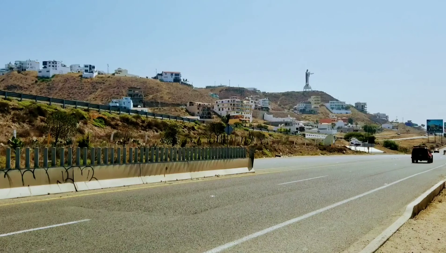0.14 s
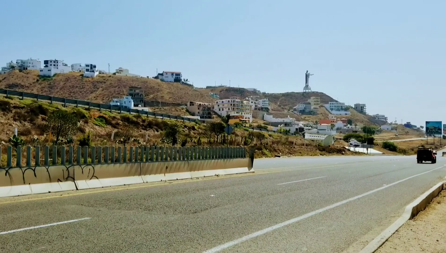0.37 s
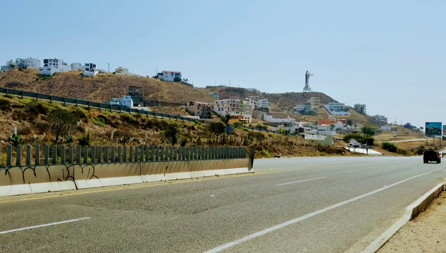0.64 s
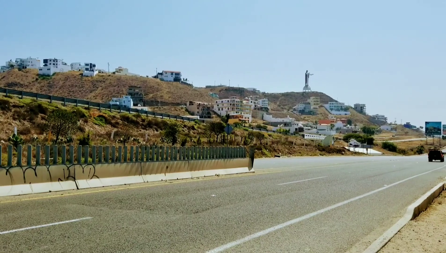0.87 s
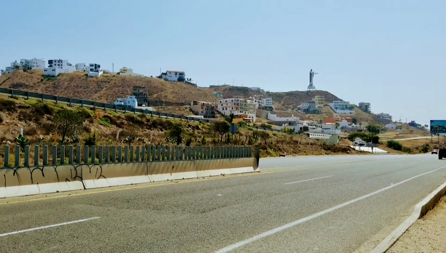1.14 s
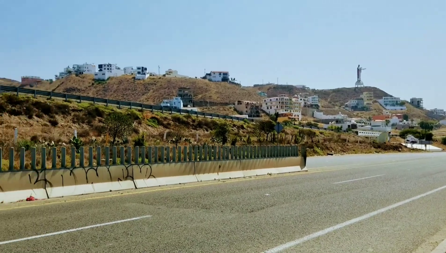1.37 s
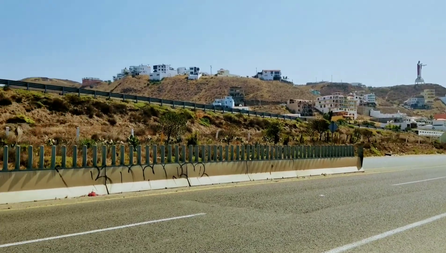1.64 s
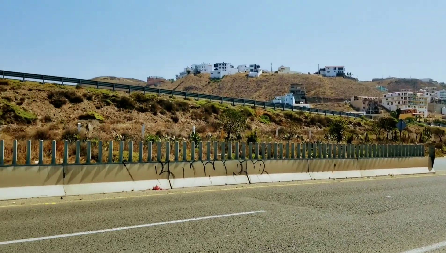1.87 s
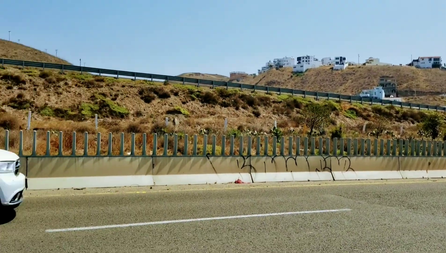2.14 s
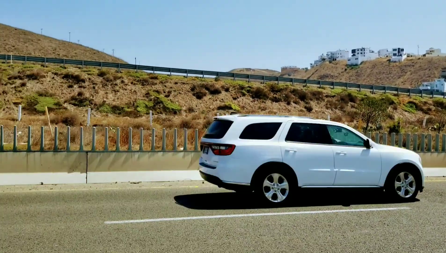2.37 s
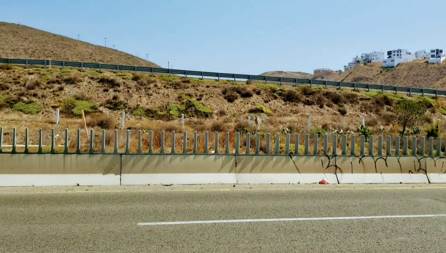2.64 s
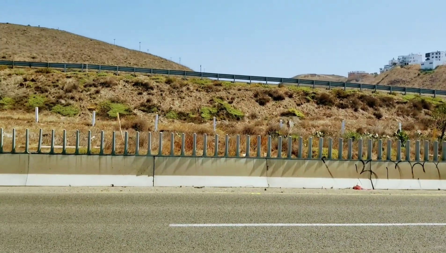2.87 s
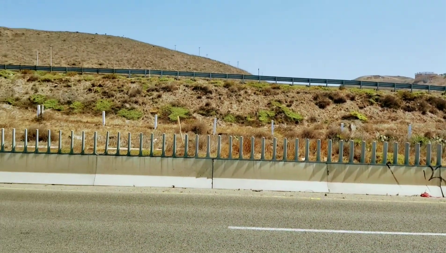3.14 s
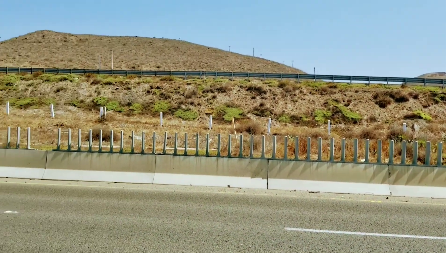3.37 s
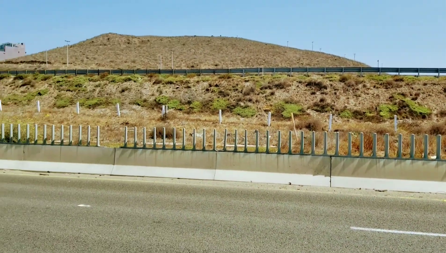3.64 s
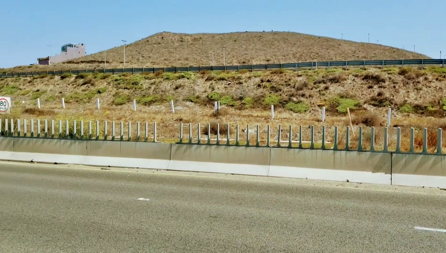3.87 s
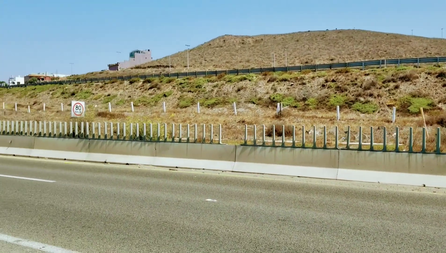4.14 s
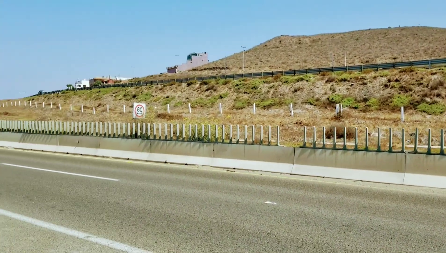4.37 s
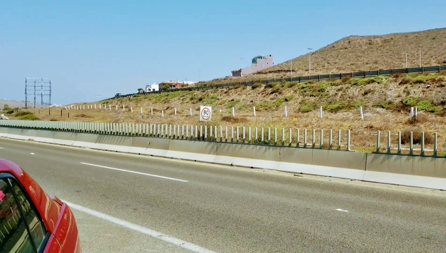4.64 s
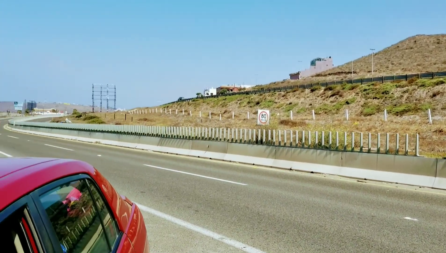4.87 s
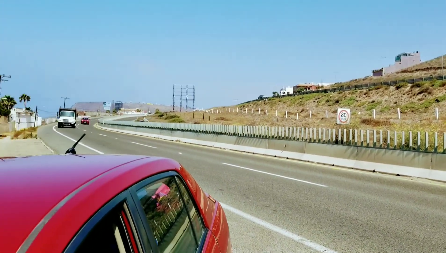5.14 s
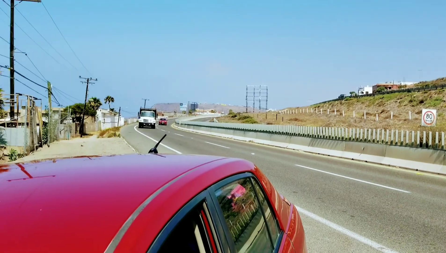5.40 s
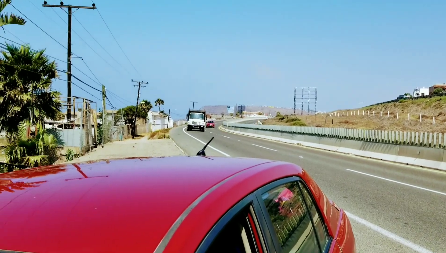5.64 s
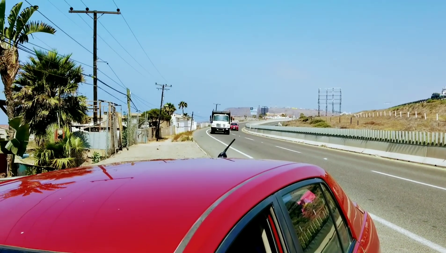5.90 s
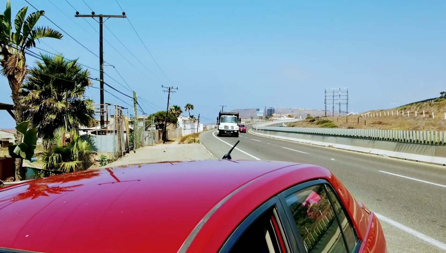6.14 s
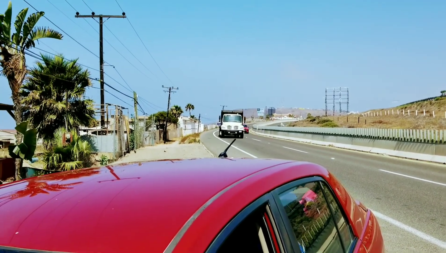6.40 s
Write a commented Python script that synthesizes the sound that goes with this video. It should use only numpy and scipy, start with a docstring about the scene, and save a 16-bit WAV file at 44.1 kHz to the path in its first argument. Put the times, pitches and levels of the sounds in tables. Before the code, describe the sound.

Outdoors beside an open highway, strong wind thumps and flutters unevenly on two microphone ports. Behind it lie a low traffic drone and bright hiss. A car's tyre roar grows from about one second, rushes past close from left to right just after two, with a throbbing boom, then fades. The wind calms, and a truck's soft wash slowly rises from up the road.

```python
"""Car passing on an open highway

A car passes close by from left to right, heard by two microphone ports that turn left in the meantime.
Tyres, body boom and air rush are shaped noise; tread and air fall in pitch, the delay between ports shifts.
From up the road come a low drone, a hiss and an approaching truck, and a bright flickering hiss, all noise.
Sharp ticks are bursts of treble noise; wind is low noise and pressure pulses, nearly separate at each port.
"""
import sys
import numpy as np
from scipy import signal
from scipy.fft import rfft, irfft, next_fast_len
from scipy.io import wavfile
from scipy.ndimage import uniform_filter1d, map_coordinates

SR = 44100
rng = np.random.default_rng(int(sys.argv[2]) if len(sys.argv) > 2 else 0)


def wav_out(sig):
    """Save sig, one row per channel (or a flat mono array), as 16-bit PCM at SR to the path in sys.argv[1]."""
    wavfile.write(sys.argv[1], SR, np.round(np.clip(np.atleast_2d(sig).T, -1, 1) * 32767).astype(np.int16))


N = 287336

STEP = 64   # samples between ticks of the slow control clock
TIMES = np.arange(0, N + STEP, STEP) / SR
FAR_BEARING_DEG = -50.5   # up the road to the left; 0 is straight across the road
CALMER_S = 4.2   # bright hiss and wind run smoother from here on


def from_db(db):
    """Turns decibels into gain."""
    return 10 ** (np.asarray(db) / 20)


def in_time(rows):
    """Reads the columns of a time table on the control clock."""
    s, *columns = np.transpose(rows)
    return [np.interp(TIMES, s, column) for column in columns]


def per_sample(control):
    """Stretches a control curve to one value per audio sample."""
    return np.interp(np.arange(N) / SR, TIMES, control)


def at_hz(points, hz, column=1):
    """Reads a spectrum table on a log-frequency axis."""
    table = np.array(points)
    return np.interp(np.log(hz), np.log(table[:, 0]), table[:, column])


def drift(rate_hz):
    """Slow random wandering with spread 1: noise smoothed twice."""
    r = np.exp(-2 * np.pi * rate_hz * STEP / SR)
    noise = rng.standard_normal(len(TIMES) + 1000)
    slow = signal.lfilter([1], [1, -2 * r, r * r], noise)[1000:]   # skip the filter's settling
    return slow / np.std(slow)


def banded(layers, patchy_db, swell_db, swell_rate, count=1, span_hz=(30, 16000), size=4):
    """Noise in bands, size to the octave, sharing the power of (shape, level, pitch factor) layers.

    All bands swell together; each also wanders alone by patchy_db.
    """
    edges = 2 ** np.arange(np.log2(span_hz[0]), np.log2(span_hz[1]), 1 / size)
    centres = np.sqrt(edges[1:] * edges[:-1])
    totals = [np.sum(from_db(2 * at_hz(shape, centres)) * np.diff(edges)) for shape, _, _ in layers]
    white = rng.standard_normal((2, count, N)) * np.sqrt(SR / 2)
    swell = swell_db * drift(swell_rate)
    out = 0
    for k, hz in enumerate(centres):
        band_filter = signal.butter(2, edges[k:k + 2], "band", fs=SR, output="sos")
        band = signal.sosfilt(band_filter, white[k % 2])   # neighbouring bands use unrelated noise
        power = sum(from_db(2 * (at_hz(shape, hz / pitch) + db)) / total
                    for (shape, db, pitch), total in zip(layers, totals))
        wander = from_db(swell + patchy_db * drift(9.2))
        out = out + band * per_sample(np.sqrt(power) * wander)
    return out


def resonance(hz, width_hz):
    """Noise ringing in one resonance, rms 1."""
    r, w = np.exp(-np.pi * width_hz / SR), 2 * np.pi * hz / SR
    tone = signal.lfilter([1, 0, -1], [1, -2 * r * np.cos(w), r * r], rng.standard_normal(N))
    return tone / np.std(tone)


# Where the ports face: start_s, facing_deg (to the right of straight across the road)
FACING = [(0, 62), (1.2, 57.5), (2.2, 52), (2.6, 28), (2.9, 17.5), (3.2, 5), (3.6, 0), (4.1, -7.5),
          (4.7, -22.5), (5.1, -27.5), (5.4, -38.5), (5.7, -50), (6.52, -54)]
PORT_GAP_MS = 0.518   # largest delay between the ports


def lag_from(bearing_deg):
    """Left port's delay in ms for a source at this bearing, as the ports turn."""
    facing_deg = in_time(FACING)[0]
    return PORT_GAP_MS * np.sin(np.radians(bearing_deg - facing_deg))


def two_ports(x, lag_ms):
    """One sound reaches the ports at two moments: left half the lag late, right half the lag early."""
    half = per_sample(lag_ms) * SR / 2000   # half the lag in samples
    return np.array([map_coordinates(x, [np.arange(N) + side * half], order=3) for side in (-1, 1)])


# Levels of the low road drone (approaching car at first, truck later) and of the far hiss:
# start_s, drone_db, hiss_db
FAR_LEVELS = [(0.0, -35, -50), (0.6, -35, -43.5), (0.9, -39, -43), (1.15, -33.5, -45), (1.35, -31.5, -46),
              (1.6, -30, -39.5), (2.0, -39, -45), (3.0, -30.5, -49), (3.4, -38.5, -47.5), (3.8, -38, -46),
              (4.15, -38, -49), (4.7, -39, -46), (5.15, -35.5, -44), (5.35, -35.5, -41), (5.6, -36, -45.5),
              (5.85, -36, -46.5), (6.52, -33.5, -51)]
# Spectrum of the drone: pitch_hz, level_db (per Hz, relative)
FAR_DRONE_SHAPE = [(50, -2), (130, -0.5), (270, 3.5), (430, -2.5), (630, -1.5), (800, -6.5), (1000, -4.5),
                   (1200, -11), (1900, -18), (3000, -30)]
# Spectrum of the far hiss: pitch_hz, level_db (per Hz, relative)
FAR_HISS_SHAPE = [(1200, -22), (2000, -4.5), (3000, -0.5), (3700, 0), (4300, 0), (5000, -10.5),
                  (6300, -10.5), (9000, -7), (11000, -11), (15500, -42)]
# Approaching truck: start_s, whine_db, tyre_wash_db, bearing_deg, wash_pitch_factor
TRUCK = [(0, -78, -75, -45, 1.05), (4.4, -76, -58, -52, 1.4), (5.0, -71, -50, -47, 1.05),
         (5.4, -48.5, -46, -39, 0.88), (5.65, -50, -43, -48, 1.07), (5.9, -49, -42.5, -56, 0.95),
         (6.15, -49.5, -40.5, -51, 1.03), (6.35, -47.5, -40.5, -48.5, 1.02), (6.52, -50, -41.5, -54, 1.05)]
# Spectrum of the truck's tyre wash: pitch_hz, level_db (per Hz, relative)
TRUCK_WASH_SHAPE = [(1000, -20), (1200, -11), (1450, 1.5), (1850, -11), (2200, -5), (2650, -8), (3300, -2),
                    (3900, -13.5), (6000, -35)]
# Resonances of the truck's engine: pitch_hz, width_hz, level_db (against the whine)
TRUCK_TONES = [(620, 47, 5.5), (1000, 130, 2), (2150, 93, -0.5)]
FAR_SPREAD_DEG = 4   # the traffic is strung out along the road


def far_traffic():
    """Hiss comes from far up the road; low drone, tyre wash and whine from the truck's bearing.

    Hiss, drone and wash spread over three bearings; all drift to the front as the ports turn.
    """
    drone_db, hiss_db = in_time(FAR_LEVELS)
    whine_db, wash_db, truck_deg, wash_pitch = in_time(TRUCK)
    road = banded([(FAR_HISS_SHAPE, hiss_db, 1)], patchy_db=.9, swell_db=.6, swell_rate=8,
                  count=3, span_hz=(1000, 16000))
    low_layers = [(FAR_DRONE_SHAPE, drone_db, 1), (TRUCK_WASH_SHAPE, wash_db, wash_pitch)]
    low = banded(low_layers, patchy_db=.9, swell_db=.6, swell_rate=8, count=3, span_hz=(45, 7000))
    whine = sum(from_db(db) * resonance(hz, width_hz) for hz, width_hz, db in TRUCK_TONES)
    # the whine sits in the middle part alone, so it makes up for the division by sqrt(3) below
    low[1] += np.sqrt(3) * whine * per_sample(from_db(whine_db))
    out = 0
    for parts, bearing in ((road, FAR_BEARING_DEG), (low, truck_deg)):
        for part, side in zip(parts, (-1, 0, 1)):
            out = out + two_ports(part, lag_from(bearing + side * FAR_SPREAD_DEG))
    return out / np.sqrt(3)


# Level of the bright hiss: start_s, level_db
BRIGHT_LEVEL = [(0, -35), (.65, -38.5), (1.2, -43), (1.4, -45), (1.65, -44.5), (2.0, -30), (2.3, -34.5),
                (2.7, -60), (3.1, -46), (3.5, -67), (4.3, -50.5), (5.1, -57), (5.5, -58), (6.52, -45.5)]
# Spectrum of the bright hiss: pitch_hz, level_db (per Hz, relative)
BRIGHT_SHAPE = [(2500, -7), (4000, 1), (4700, 5.5), (6000, 0.5), (9000, 3.5), (12000, 0), (14500, 0),
                (15800, -1)]


def bright_hiss():
    """Flickering treble noise from the bearing of the far hiss."""
    flicker_db = np.where(TIMES < CALMER_S, 2.0, 0.8)
    hiss = banded([(BRIGHT_SHAPE, in_time(BRIGHT_LEVEL)[0], 1)], patchy_db=-0.5, swell_db=flicker_db,
                  swell_rate=20, span_hz=(2000, 16000))[0]
    left, right = two_ports(hiss, lag_from(FAR_BEARING_DEG))
    # the body around the ports shades the right one's top octave
    shade = signal.butter(2, 10500, fs=SR, output="sos")
    return np.array([left, signal.sosfiltfilt(shade, right)])


# Small sharp ticks near the road: start_s, peak_db (before the band filter), left_minus_right_db
TICKS = [(0.3925, -29, 9), (0.7773, -21, 3), (0.849, -26, -6), (1.2296, -31, 1.0), (2.2994, -25, -13),
         (2.3694, -24, 1.0), (3.4005, -30, 0.5), (4.333, -35, 0.5), (5.358, -34, -2)]


def ticks():
    """Each tick is a few milliseconds of dying treble noise."""
    out, t = np.zeros((2, N)), np.arange(600) / SR
    noises = rng.standard_normal((len(TICKS), len(t))) * t * np.exp(-t / .0015)
    noises = noises / np.max(np.abs(noises), axis=1, keepdims=True)
    for (s, db, pan_db), noise in zip(TICKS, noises):
        at = round(s * SR)
        out[:, at:at + len(t)] += noise * from_db(db + pan_db * np.array([[.5], [-.5]]))
    return signal.sosfilt(signal.butter(1, [4000, 12000], "band", fs=SR, output="sos"), out)


# Steady breeze: start_s, level_db, left_minus_right_db, left_depth_db, right_depth_db
# (depth: deep thud against flutter, before the flutter's own cut)
BREEZE = [(0, -19.5, 12, 15, 19), (.3, -25, 11, 16, 7), (.65, -26.5, -4, -3, -15),
          (1.25, -36, -1, -6.5, -10), (1.9, -30, 9, -9, -11), (2.5, -25, 3, -12, -17),
          (2.8, -26.5, -3.5, -1, -1), (3.04, -37, 1, -5, 0), (3.5, -36, -6, 8, -3), (3.95, -34.5, 8, 1, -9),
          (4.35, -34.5, -10, 7, 0), (4.62, -33.5, -2, 3, -5), (4.9, -34.5, -8, 6, -9.5),
          (5.3, -32, -5.5, 2, -7), (5.55, -44, -5, 1, 0), (5.8, -50, 5, -4, -2), (6.52, -37.5, 1, 7, -4)]
# Gusts: peak_s, length_s, left_db, right_db
GUSTS = [(0.047, 0.095, -16, -13), (0.194, 0.16, -17, -27), (0.403, 0.064, -17.5, -14.5),
         (0.54, 0.12, -17.5, -36), (0.913, .14, -18.5, -18), (1.09, 0.12, -19.5, -22),
         (1.38, 0.18, -27.5, -30.5), (1.456, 0.096, -25.5, -25), (1.538, 0.1, -17, -21.5),
         (1.676, 0.14, -20.5, -19.5), (1.986, 0.039, -21, -16), (2.203, 0.24, -19, -21),
         (2.34, 0.1, -23, -19.5), (2.445, 0.033, -16, -14), (2.633, 0.11, -22, -22), (2.78, 0.15, -35, -32),
         (3.155, 0.077, -25, -31), (3.293, 0.13, -27, -24.5), (3.507, 0.064, -31, -25.5),
         (3.682, 0.084, -41, -25), (3.917, 0.26, -32, -24), (4.07, 0.085, -28, -27),
         (4.25, 0.12, -27, -27.5), (4.487, 0.12, -41, -36), (4.777, 0.074, -27, -27.5),
         (4.91, 0.073, -41, -28), (5.15, 0.14, -36.5, -38), (5.56, 0.052, -34, -41),
         (5.906, 0.064, -24.5, -25.5), (6.047, 0.066, -23, -23.5), (6.268, 0.086, -30.5, -32)]
GUST_RISE, GUST_FALL = 0.55, 0.79   # shares of a gust's length


def gust_levels():
    """Each gust swells fast and dies slower over the steady breeze; dB at the left and right port."""
    breeze_db, pan_db = in_time(BREEZE)[:2]
    power = from_db([2 * breeze_db + pan_db, 2 * breeze_db - pan_db])
    for s, length_s, *peak_db in GUSTS:
        spread_s = length_s * np.where(TIMES < s, GUST_RISE, GUST_FALL)
        swell = np.exp(-((TIMES - s) / spread_s) ** 2)
        power = power + np.outer(from_db(2 * np.array(peak_db)), swell)
    return 10 * np.log10(power)


# Single eddies: start_s (of the peak), peak_db (before the filters), half_width_ms,
# port (0 left, 1 right), sign (1 pressing, -1 sucking)
POPS = [(0.0609, -3, 1.8, 1, 1), (0.0625, 1, 1.6, 0, -1), (0.0874, 3, 1.8, 1, -1), (0.1378, 3, 1.15, 0, 1),
        (0.1552, 0, 1.5, 0, -1), (0.1596, 2, 1.7, 1, -1), (0.1708, -1.5, 2.1, 0, -1),
        (0.2828, -5.5, 0.59, 1, 1), (0.2984, -3.5, 1.6, 0, -1), (0.355, 8, 1.6, 1, 1),
        (0.3853, 0.5, 1.5, 0, 1), (0.3975, 0, 1.3, 1, 1), (0.4499, -5, 1.3, 0, 1),
        (0.4778, -2.5, 1.2, 1, 1), (0.5533, 1.5, 0.79, 1, -1), (0.5549, -2, 1.6, 0, 1),
        (0.6045, -2.5, 0.54, 0, -1), (0.6835, -3.5, 0.74, 0, 1), (0.7296, -10.5, 0.9, 1, 1),
        (0.7621, -5.5, 0.84, 0, 1), (0.822, -7, 0.6, 1, 1), (0.8331, -3.5, 1.1, 0, -1),
        (0.842, -10, 0.57, 1, 1), (0.8605, -8, 0.6, 1, 1), (0.884, -5.0, 0.7, 1, 1),
        (0.8929, -0.5, 0.79, 0, 1), (0.8948, -6, 0.5, 1, 1), (0.9025, -8, 0.6, 1, 1),
        (0.9151, -8, 0.7, 1, 1), (0.931, -7, 0.8, 1, 1), (0.9308, -4, 0.9, 0, 1), (0.9471, -6, 0.7, 1, 1),
        (0.9481, -8, 0.7, 0, -1), (0.9675, -6.5, 0.47, 1, 1), (1.1587, -9, 0.86, 1, 1),
        (1.4653, 1, 0.8, 0, -1), (1.5298, 1, 0.7, 1, -1), (1.565, 2, 0.39, 1, 1), (1.571, 0, 0.7, 0, 1),
        (1.653, 1, 0.8, 0, 1), (1.6704, 5, 0.56, 0, 1), (1.6957, 4, 0.9, 0, -1), (1.7062, 0, 1.6, 1, -1),
        (1.8746, -0.5, 0.28, 1, -1), (1.9915, -2, 0.64, 1, -1), (2.0876, 0, 0.42, 0, 1),
        (2.088, -2, 0.35, 1, 1), (2.1524, -3, 0.7, 0, 1), (2.179, 2, 0.63, 1, -1), (2.3178, 0, 1.1, 1, 1),
        (2.3328, 2.0, 1.2, 1, -1), (2.6037, -2, 0.65, 1, 1), (2.6051, -1.5, 0.64, 0, -1),
        (3.1622, -2.5, 0.66, 1, 1), (3.8788, -4.0, 2, 1, 1), (3.8825, -6.0, 2, 0, 1),
        (3.9404, -11, 0.48, 0, 1), (3.997, -11, 0.38, 1, -1), (4.0585, -4, 0.94, 0, -1),
        (4.059, -6, 0.8, 1, 1), (4.0838, -4.5, 0.98, 1, -1), (4.118, -7.5, 0.94, 1, 1),
        (4.133, -7.5, 1.4, 1, -1), (4.51, -11.5, 0.9, 0, 1), (4.9113, -10.5, 0.54, 0, -1),
        (5.8872, -8, 1, 1, 1), (5.911, -11.0, 0.75, 1, 1), (5.912, -11, 0.8, 0, -1),
        (5.916, -2.5, 1.2, 0, -1), (5.9314, -4.0, 1.6, 1, -1), (6.026, -13, 0.84, 1, 1),
        (6.0432, -10, 0.7, 0, -1), (6.0461, -9, 0.87, 1, -1), (6.0546, -9, 0.6, 1, 1),
        (6.055, -12, 1.1, 0, 1), (6.061, -15, 0.87, 1, -1), (6.076, -13, 0.81, 0, 1),
        (6.2665, -12, 0.99, 1, 1)]
EDDIES_PER_S, EDDY_WIDTH_MS = 90, 0.91   # random eddies at each port
EDDY_DB, PRESSING_SHARE = -1, 0.65   # random eddies against the gust; share of them that press
RECOIL_HZ, RATTLE_DB = 160, -5.0   # the vent's recoil; rattle noise against its eddy, both before filters


def eddies(gust_db):
    """Short pushes and dips of pressure, with the recoil of the port's vent.

    Listed eddies also leave a brief rattle.
    """
    t_ms = np.arange(-150, 151) / SR * 1000
    born = rng.random((2, N)) < EDDIES_PER_S / SR
    extra_db = 5.3 * np.minimum(rng.exponential(1, (2, N)), 3)
    sizes = from_db(extra_db) * [per_sample(from_db(g + EDDY_DB)) for g in gust_db]
    signs = np.where(rng.random((2, N)) < PRESSING_SHARE, 1, -1)
    pulse = np.exp(-(t_ms / EDDY_WIDTH_MS) ** 2)
    pushes = signal.fftconvolve(born * sizes * signs, [pulse], "same", axes=1)
    kicks = np.zeros((2, N))
    for s, db, width_ms, port, sign in POPS:
        port, at = round(port), round(s * SR) - 150
        pushes[port, at:at + len(t_ms)] += np.sign(sign) * from_db(db) * np.exp(-(t_ms / width_ms) ** 2)
        kicks[port, at + 150] = from_db(db)
    # the turbulent wake dies within milliseconds
    wake = signal.lfilter([1], [1, -np.exp(-1 / (0.0076 * SR))], kicks + 1e-18)
    rattle_filter = signal.butter(2, [180, 650], "band", fs=SR, output="sos")
    rattle = signal.sosfilt(rattle_filter, rng.standard_normal((2, N)))
    recoiling = signal.sosfilt(signal.butter(2, RECOIL_HZ, "high", fs=SR, output="sos"), pushes)
    both = recoiling + from_db(RATTLE_DB) * wake * rattle
    return signal.sosfilt(signal.butter(4, 1800, fs=SR, output="sos"), both)


# Spectrum of the deep thud: pitch_hz, level_db (per Hz, relative)
THUD_SHAPE = [(25, -11), (50, -6.5), (75, -3.5), (110, 3), (170, -2.5), (300, -31), (600, -53)]
# Spectrum of the flutter: pitch_hz, level_db (per Hz, relative)
FLUTTER_SHAPE = [(90, -43), (170, -10), (280, -2), (420, -11.5), (700, -25), (1200, -32), (2000, -62)]
FLUTTER_CUT_DB = -6   # applied to the flutter's share of the gust


def wind():
    """Lumpy low noise and eddies, nearly unrelated at the ports; the deepest push is slightly opposed."""
    gusts, depths = gust_levels(), in_time(BREEZE)[2:]
    lumps_db = np.where(TIMES < CALMER_S, 3.2, 1.8)
    out = np.zeros((2, N))
    for port, (gust_db, depth_db) in enumerate(zip(gusts, depths)):
        thud_share = 1 / (1 + from_db(-2 * depth_db))
        thud_db = gust_db + 10 * np.log10(thud_share)
        flutter_db = gust_db + FLUTTER_CUT_DB + 10 * np.log10(1 - thud_share)
        out[port] = banded([(THUD_SHAPE, thud_db, 1), (FLUTTER_SHAPE, flutter_db, 1)], patchy_db=2.5,
                           swell_db=lumps_db, swell_rate=40.0, span_hz=(22, 1800), size=2)[0]
    # strong deep gusts hiss past the left port's edge
    push_db = uniform_filter1d(gusts[0] - 10 * np.log10(1 + from_db(-2 * depths[0])), size=100)
    edge_filter = signal.butter(4, 12000, "high", fs=SR, output="sos")
    edge_hiss = signal.sosfilt(edge_filter, rng.standard_normal(N))
    out[0] += edge_hiss * per_sample(from_db(1.74 * push_db - 1.5))
    deep = signal.sosfiltfilt(signal.butter(1, 90, fs=SR, output="sos"), out)
    return out - 0.22 * deep[::-1] + eddies(gusts)


# Levels of the passing car, before the axle and mirror gains:
# start_s, tyre_roar_db, tread_wash_db, tread_hiss_db
PASSING = [(0, -41.5, -42, -47.5), (0.9, -35, -53.5, -49.5), (1.05, -33, -45, -49), (1.15, -30, -40.5, -45),
           (1.4, -26.5, -37, -45.5), (1.65, -23, -39, -39), (1.9, -21, -28.5, -32.5),
           (2.0, -19.5, -26, -28.5), (2.08, -19, -25.5, -28.5), (2.16, -19, -29, -26),
           (2.24, -18, -30, -29), (2.33, -23.5, -28.5, -29), (2.4, -22.5, -26.5, -28.5),
           (2.47, -25, -28.5, -35.5), (2.54, -18.5, -30, -31.5), (2.58, -20.5, -29, -33.5),
           (2.63, -21, -30.5, -37), (2.75, -22.5, -38.5, -37.5), (2.9, -24.5, -38.5, -42),
           (3.2, -29, -43, -44.5), (3.6, -27.5, -43, -47), (4.05, -34, -46, -51.5), (4.3, -39.5, -55, -47),
           (4.7, -43.5, -53.5, -53), (5.2, -49, -56, -63), (6.52, -51, -61, -72)]
# Level of the car's air rush: start_s, level_db
AIR_LEVEL = [(0, -42.5), (1.0, -42.5), (1.4, -43), (1.55, -37), (1.8, -38.5), (1.95, -29.5), (2.2, -37),
             (2.45, -36), (2.7, -40.5), (3.1, -43.5), (3.4, -48), (3.6, -74), (6.52, -72)]
# Spectrum of the tyre roar: pitch_hz, level_db (per Hz, relative)
TYRE_ROAR_SHAPE = [(90, -24), (250, -5), (480, -7.5), (620, -3), (800, -1), (1050, -2), (1300, -6.5),
                   (1600, -15.5), (2100, -26), (3000, -38)]
# Spectrum of the tread wash: pitch_hz, level_db (per Hz, relative)
TREAD_WASH_SHAPE = [(800, -35), (1200, 2), (1800, 0), (2400, -3), (3200, -18), (4500, -40)]
# Spectrum of the tread hiss: pitch_hz, level_db (per Hz, relative)
TREAD_HISS_SHAPE = [(1500, -40), (2400, -9.5), (3000, -4), (4300, -4), (6200, -15.5), (8500, -20),
                    (12000, -37)]
# Spectrum of the air rush: pitch_hz, level_db (per Hz, relative)
AIR_RUSH_SHAPE = [(6000, -33), (9000, 2), (11500, -1.5), (15500, -2)]
# Spectrum of the narrow boom from under the body: pitch_hz, level_db (per Hz, relative)
BOOM_SHAPE = [(520, -13), (620, -4.5), (735, 6), (830, -9.5), (950, -29)]
CLOSEST_S, SPEED_M_S, LANE_M, WHEELBASE_M = 2.152, 26, 5.6, 2.8
AXLE_DB, MIRROR_DB, MIRROR_M = -3.5, -11.5, 13   # the mirror image lies beyond the barrier
ROAD_ECHO_DIP = 0.17   # the echo off the road pulls the roar's hump down when the car is near
ROAR_PITCH_HOLD = 0.061   # offsets most of the Doppler drop in the roar
SURGE_DB, SURGE_RATE_HZ, TYRE_PATCHES_DB = 1.4, 16, 1.4   # rough asphalt makes the tyres surge
FAR_SURGING = 0.5   # share of the surging that is left when the car is far
BOOM_S, BOOM_LENGTH_S, BOOM_DB = 2.314, 0.35, -21.5   # 10 dB down one length from its centre
BOOM_LUMPS_DB, BOOM_LUMP_RATE_HZ = 1.5, 22
THROB_DB, THROBS_PER_S, THROB_PEAK_S = 4.0, 19.04, 2.26   # even throbbing of the boom


def car():
    """Two axles and a mirror image in the barrier, each with its own noise, and an air rush.

    Doppler lowers tread and air sounds, the roar far less; the rear axle crosses a moment later.
    The air rush is unrelated at the ports.
    """
    along_m = SPEED_M_S * (TIMES - CLOSEST_S)
    distance_m = np.hypot(along_m, LANE_M)
    heading, nearness = along_m / distance_m, LANE_M / distance_m
    roar_db, wash_db, hiss_db = in_time(PASSING)
    doppler = 1 / (1 + SPEED_M_S / 343 * heading)   # sound travels at 343 m/s
    echo = 1 + ROAD_ECHO_DIP * nearness
    pitch_hold = 1 + ROAR_PITCH_HOLD * heading
    boom_db = BOOM_DB - 10 * ((TIMES - BOOM_S) / BOOM_LENGTH_S) ** 4
    boom_db = boom_db + BOOM_LUMPS_DB * drift(BOOM_LUMP_RATE_HZ)
    boom_db = boom_db + THROB_DB * np.cos(2 * np.pi * THROBS_PER_S * (TIMES - THROB_PEAK_S))
    rough = FAR_SURGING + (1 - FAR_SURGING) * nearness
    layers = [(TYRE_ROAR_SHAPE, roar_db, doppler * pitch_hold / echo), (BOOM_SHAPE, boom_db, 1),
              (TREAD_WASH_SHAPE, wash_db, doppler), (TREAD_HISS_SHAPE, hiss_db, doppler)]
    air = banded([(AIR_RUSH_SHAPE, in_time(AIR_LEVEL)[0], doppler)], patchy_db=.9, swell_db=.6,
                 swell_rate=12, count=2, span_hz=(5000, 16000))
    sources = banded(layers, patchy_db=TYRE_PATCHES_DB * rough, swell_db=SURGE_DB * rough,
                     swell_rate=SURGE_RATE_HZ, count=3, span_hz=(70, 14000), size=6)
    # front axle, rear axle, mirror image: metres ahead of the car's middle, metres away, gain
    places = [(WHEELBASE_M / 2, LANE_M, AXLE_DB), (-WHEELBASE_M / 2, LANE_M, AXLE_DB),
              (0, MIRROR_M, MIRROR_DB)]
    out = air
    for source, (ahead_m, away_m, db) in zip(sources, places):
        bearing_deg = np.degrees(np.arctan2(along_m + ahead_m, away_m))
        out = out + two_ports(source, lag_from(bearing_deg)) * from_db(db)
    return out


def scatter(x, level_db, t60, piece_s):
    """Short scatter off barrier, bank and a parked car: dying noise tails, new for each piece and port."""
    t, hop = np.arange(int(.1 * SR)) / SR, int(piece_s * SR)
    out = np.zeros((2, N + SR))
    for at in range(0, N, hop):
        tails = rng.standard_normal((2, len(t))) * from_db(-60 * t / t60) * (t > .002)
        tails /= np.sqrt(np.sum(tails ** 2, axis=1, keepdims=True))
        start = max(at - hop, 0)
        piece = x[:, start:at + hop]
        # neighbouring pieces crossfade
        fade = np.cos(np.pi / 2 * (np.arange(start, at + hop)[:piece.shape[1]] - at) / hop)
        wet = signal.fftconvolve(piece * fade, tails, axes=1)
        out[:, start:start + wet.shape[1]] += wet
    wet = out[:, :N]
    treble = signal.sosfilt(signal.butter(1, 2500, "high", fs=SR, output="sos"), wet)
    return x + from_db(level_db) * (wet + 1.27 * treble)   # short waves scatter more


def scene():
    """Airborne sounds scatter at the roadside; wind acts on the ports directly."""
    sources = car() + far_traffic() + bright_hiss() + ticks()
    airborne = scatter(sources, level_db=-15.0, t60=0.044, piece_s=.08)
    return airborne + wind()


def top_cut(x):
    """Nothing passes above the cut-off."""
    return signal.sosfilt(signal.butter(12, 16080, fs=SR, output="sos"), x)


# Response of the ports: pitch_hz, left_db, right_db
PORTS = [(98.5, -8, -7), (984, 3.5, 2), (3650, -2, -3), (6430, -2, -2), (7730, -16, -23.5),
         (8400, -23, -21.5), (11800, -9.5, -9.5), (12900, -10, -19.5), (15500, -7, -5)]
# White electronic hiss, one row per port (left, right): level_db
SELF_NOISE_DB = [
    [-58.5],
    [-72],
]
START_S = 0.0418   # silence before this moment
OVERLOAD = 0.98   # peaks are rounded towards this height


def record(dry):
    """Port colour with a dip near 8 kHz, electronic hiss, an abrupt start and rounded peaks."""
    size = next_fast_len(N + 4096)
    hz = np.maximum(np.arange(size // 2 + 1) * SR / size, 1)
    colour = from_db([at_hz(PORTS, hz, column=1), at_hz(PORTS, hz, column=2)])
    heard = irfft(rfft(dry, size) * colour, size)[:, :N]
    heard = heard + from_db(SELF_NOISE_DB) * rng.standard_normal((2, N))
    heard = heard * np.clip((np.arange(N) / SR - START_S) / 0.00099, 0, 1)   # opens within a millisecond
    heard = OVERLOAD * np.tanh(heard / OVERLOAD)
    return top_cut(heard)


dry = scene()
out = record(dry)
wav_out(out)
```